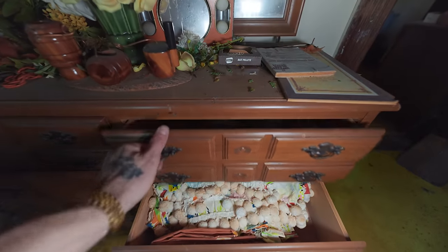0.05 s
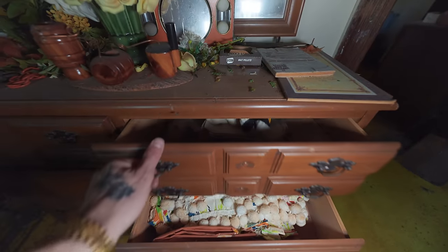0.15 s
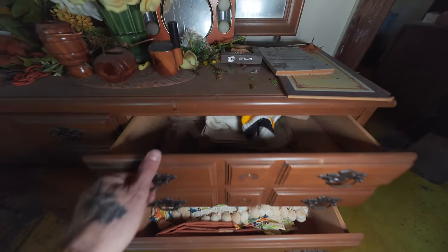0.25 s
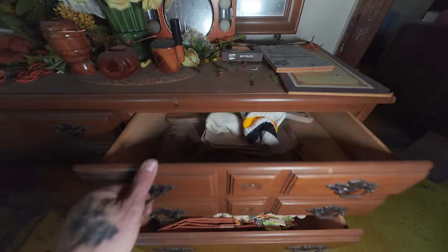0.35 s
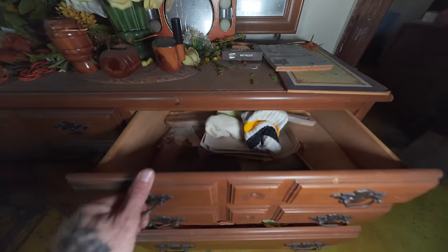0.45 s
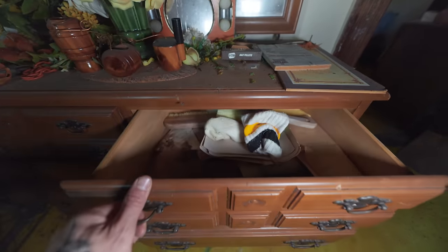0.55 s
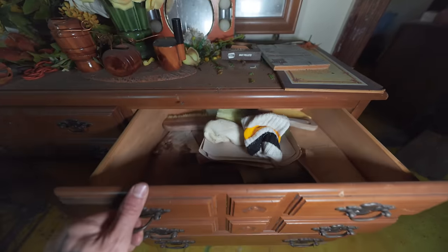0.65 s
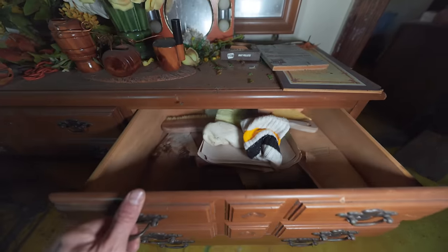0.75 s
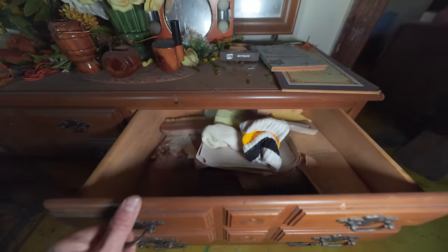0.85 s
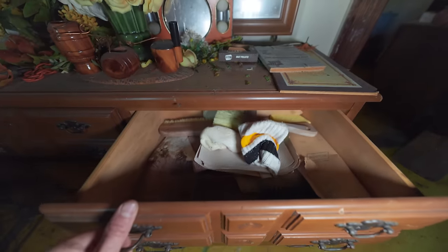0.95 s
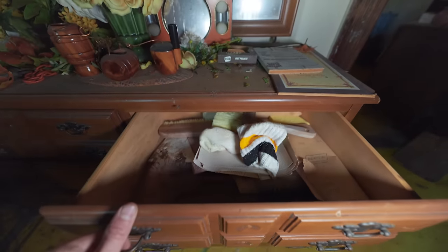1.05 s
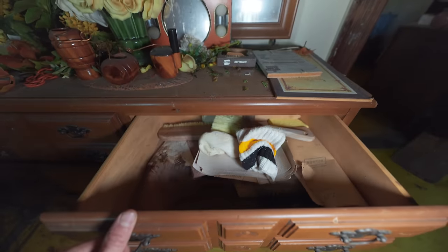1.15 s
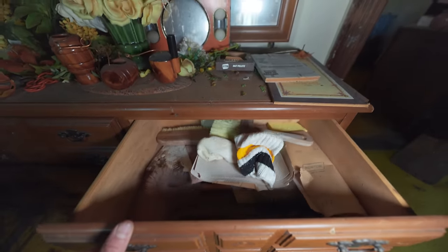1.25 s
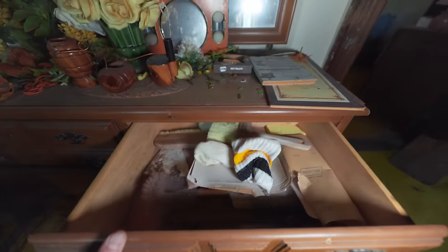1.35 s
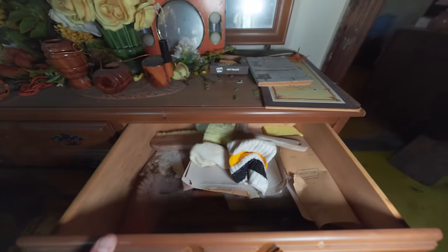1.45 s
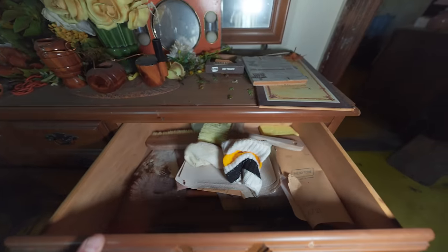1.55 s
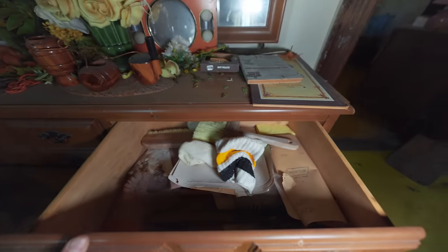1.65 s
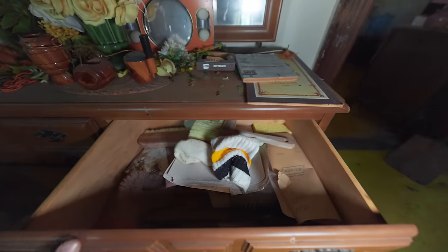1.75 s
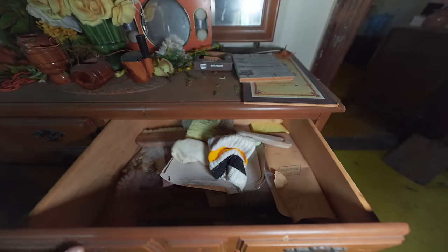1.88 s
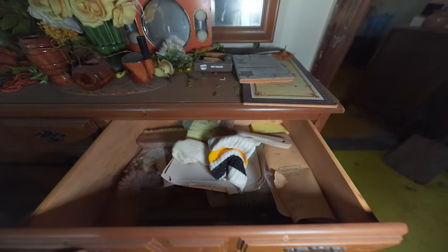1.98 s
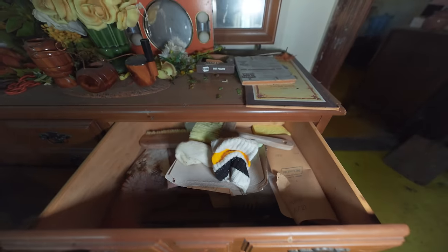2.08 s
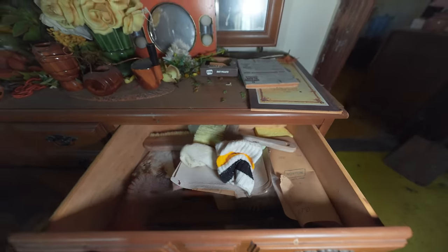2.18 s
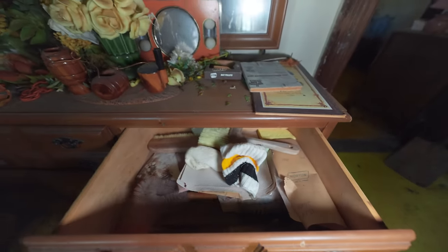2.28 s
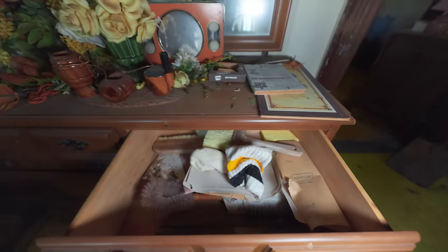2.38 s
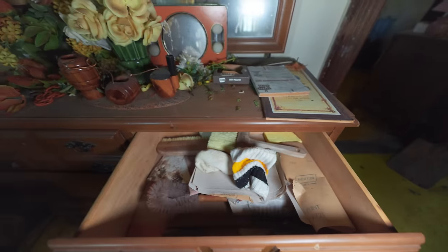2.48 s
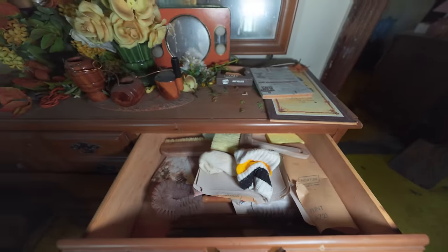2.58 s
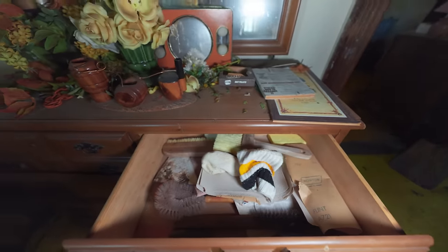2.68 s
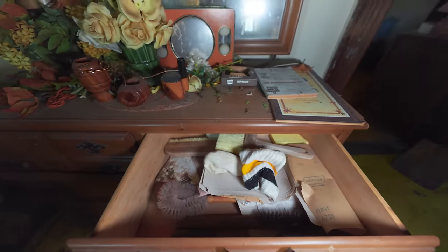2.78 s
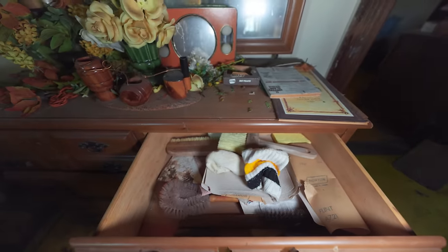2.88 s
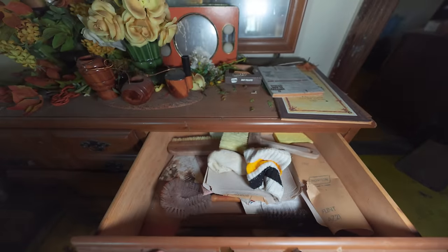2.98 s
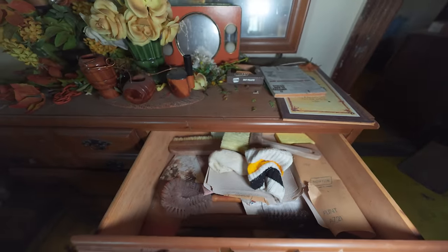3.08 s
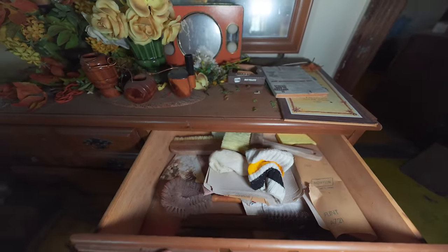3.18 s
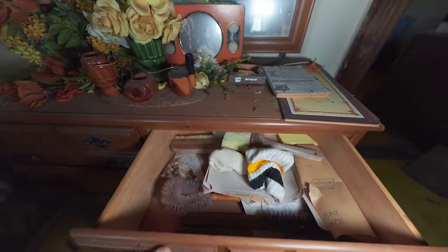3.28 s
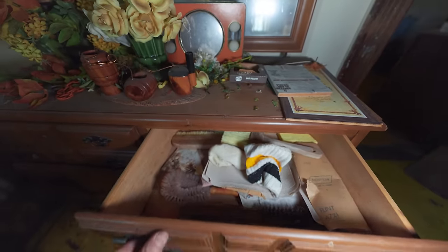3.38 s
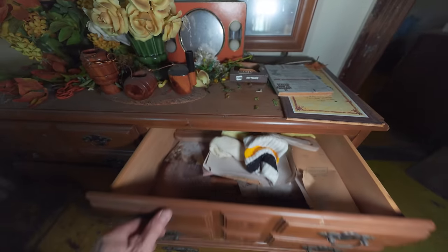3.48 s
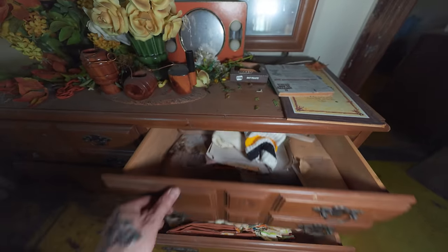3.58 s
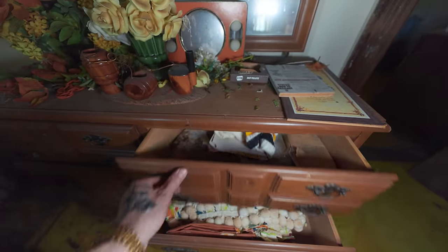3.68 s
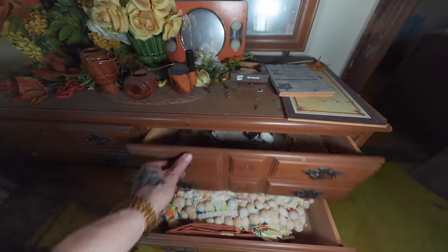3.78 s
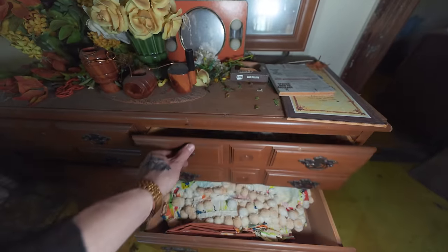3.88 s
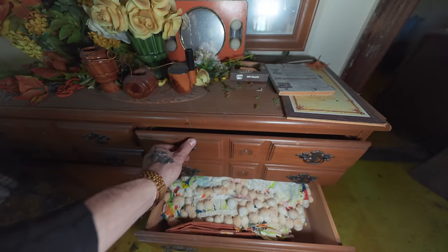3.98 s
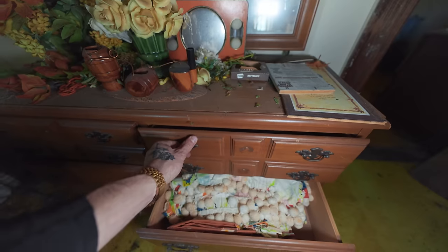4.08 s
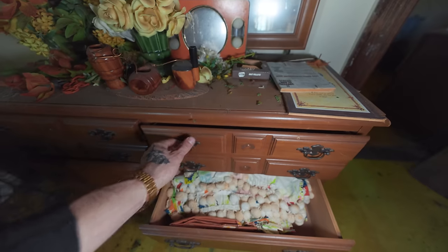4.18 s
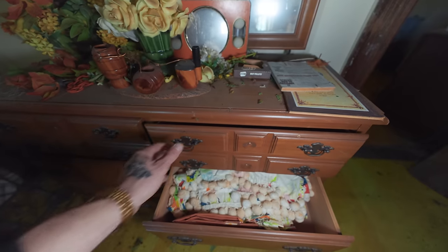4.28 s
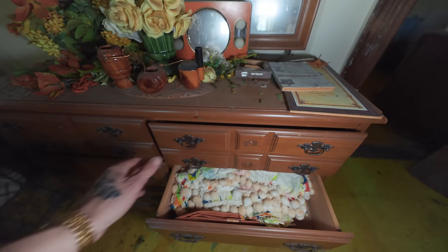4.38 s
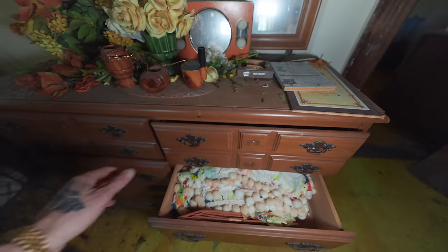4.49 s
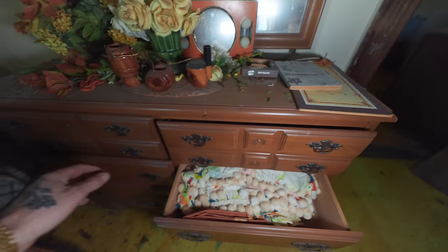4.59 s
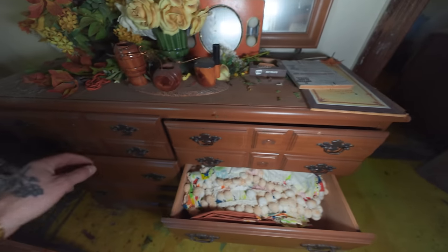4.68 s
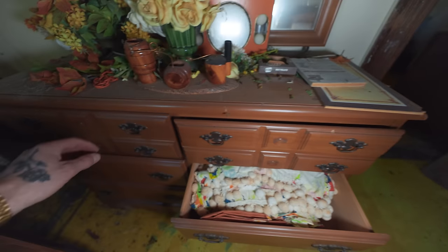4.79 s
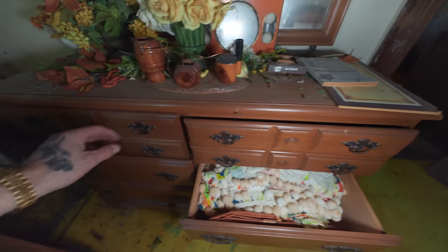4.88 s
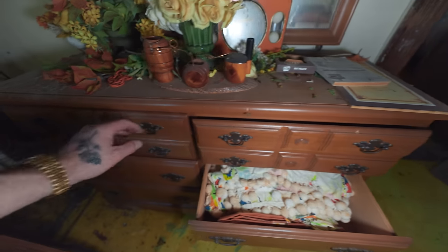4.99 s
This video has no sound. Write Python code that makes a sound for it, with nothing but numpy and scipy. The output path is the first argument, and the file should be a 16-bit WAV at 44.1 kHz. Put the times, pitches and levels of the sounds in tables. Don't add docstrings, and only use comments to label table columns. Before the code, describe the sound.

Close microphone in a still, quiet room: a dresser drawer starts with ticks and a stick-slip wooden rub, booms hollowly, and slides on with a faint creaky hum. Sparse ticks and soft knocks follow while it stands open. A knock begins the return slide, ending in loud bright clacks, a solid wooden bump and a few last clicks.

```python
import sys
import numpy as np
from scipy import signal
from scipy.fft import rfft, irfft
from scipy.io import wavfile

SR = 44100
rng = np.random.default_rng(int(sys.argv[2]) if len(sys.argv) > 2 else 0)


def wrap_up_sound(samples):
    columns = np.atleast_2d(samples).T
    tamed = np.clip(columns, -1, 1)
    steps = np.round(tamed * 32767).astype(np.int16)
    wavfile.write(sys.argv[1], SR, steps)


def ratio_of_db(decibels):
    return 10 ** (np.asarray(decibels, float) / 20)


N = 222264

# time_s, rubbing_effort_db, runner_weight_db, panel_under_contact_hz
PULL_STROKE = [
    (0, -43, 21, 430),
    (.07, -45.5, 15, 940),
    (.17, -36.5, -3.5, 740),
    (.27, -40.5, 6.5, 480),
    (.45, -45, 3.5, 646),
    (.7, -49.5, 6, 775),
    (.85, -51.5, -1, 1050),
    (1.02, -53.5, -10, 988),
    (1.09, -65, -10, 700),
]
PUSH_STROKE = [
    (3.4, -45.5, -4, 450),
    (3.412, -44, -4, 450),
    (3.46, -45.5, -4, 380),
    (3.56, -42, -4, 686),
    (3.69, -42.5, 5, 470),
    (3.9, -42, 2.5, 810),
    (3.99, -40.5, -3, 770),
    (4.06, -48.5, 12.5, 455),
    (4.15, -51.5, 7, 800),
]
# start_s, length_s, effort_db, weight_db, panel_hz
NUDGES = [
    (1.167, 0.42, -51.5, -21, 745),
    (1.312, 0.23, -48.5, -15, 1010),
    (1.659, 0.36, -46, -24, 573),
    (1.855, .39, -47, -10.5, 463),
    (2.38, 0.2, -59, -15, 444),
    (2.534, 0.11, -61, -5, 556),
    (2.711, 0.096, -55, -19, 1010),
    (2.994, 0.9, -57, 8, 795),
    (4.117, 0.4, -52, 12, 1070),
    (4.782, 0.31, -52.5, 7, 583),
]
# reference_level_db, slope_db_per_db, weight_share, rest_db
LAYER_ANSWERS = [
    (-45, 1.78, 0.76, -65),
    (-45.5, 1.14, 0.0033, -63.5),
    (-50, 0.91, 0.06, -67),
    (-59.5, 1.22, 0.23, -73.5),
]
# start_s, level_db, weight_db, hold_s
JOLTS = [
    (4.305, -41, -12, 0.099),
    (4.479, -45.5, -10.5, 0.02),
    (4.64, -31, -10.5, 0.076),
]
# level_db, weight_share, rise_s, fade_db_per_s
LAYER_SHAKING = [
    (0, 0.55, 0.036, 181),
    (7, 0.9, 0.0027, 155),
    (-1.2, .01, 0.0069, 250),
    (-7.5, .1, .008, 222),
]
# pitch_hz, width_hz, level_db
CARCASS = [(51.5, 14, -40), (90, 5.5, 2), (133, 7, 1), (189, 5.6, -3), (215, 36, -2.5)]
PANELS = [(352, 370, -2), (438, 145, -1.5), (580, 55, -9), (700, 54, -1.5), (906, 126, -10.5),
          (1120, 235, 0), (1300, 130, -10)]
EDGES = [(1600, 590, -1), (2145, 180, -5), (2560, 163, -4), (3030, 970, -3.5), (3960, 1800, -3)]
# frequency_hz, density_db
HISS = [(2820, -66), (4800, -10.5), (5990, -7.5), (8740, -12), (12800, -11.5), (15100, -23), (16100, -38),
        (16500, -53)]
# frequency_hz, density_db
STILLNESS = [(30, -1), (97, 12), (300, -9.5), (1000, -34), (2600, -17), (5130, -29), (11500, -19.5),
             (15500, -24)]
# start_s, peak_db, pitch_hz, t60_s, swell_s
BOOMS = [
    (0.013, -24, 93.8, 0.43, 0.0058),
    (.295, -8.5, 134, 0.16, 0.035),
    (0.59, -30.5, 131.4, 0.46, .04),
    (1.585, -34, 133, 0.26, 0.016),
    (3.65, -25.5, 128.2, 0.41, 0.011),
    (3.932, -28, 188, 0.34, 0.024),
    (4.656, -20, 90, 0.24, 0.018),
    (4.74, -32.5, 50.6, 0.4, 0.025),
]
# start_s, peak_db, wood_share_db, brightness_db, loudest_ring_hz
TICKS = [(0.0174, -47, 19.5, -19, 1700), (0.0574, -21, -1.5, -7, 3930), (0.0877, -26, -16, -20, 3600),
         (0.1331, -26.5, -1, -8, 4440), (1.3867, -26.5, -1, -8, 3350), (1.6079, -22.5, 0.5, -8.5, 3600),
         (1.8986, -27, 0, -16, 3570), (2.038, -66, -7, 13, 4750), (2.075, -76, -7, -1, 4800),
         (2.105, -68, -18, -20, 3360), (2.374, -28.5, -11, -4.5, 3970), (2.4494, -50, 2, -12, 1500),
         (2.5713, -31, -11, -13, 3400), (2.7394, -54, -14, -20, 2200), (2.9224, -20, -12, -8.5, 3570),
         (3.080, -35, -15, -26, 3380), (3.2025, -22, -10, -2, 3600), (3.4047, -47, 4, -19, 2390),
         (3.5698, -29, -20, -7, 4640), (3.8267, -24.5, 2.5, -10, 1730), (3.9742, -23.5, -0.5, -7.5, 1700)]
# pitch_hz, level_db, t60_s (with the room)
TICK_MODES = [(770, -5, 0.64), (1097, 19, 0.063), (1700, 0, 0.4), (2550, 2.5, 0.2), (4810, 4.5, 0.3),
              (3350, 0, 0.2), (3750, -12, 0.063), (4030, 8, 0.034), (5950, -20, 0.047), (6360, 5, 0.06),
              (7160, 8, 0.18), (8100, -9, 0.28), (9100, 2, 0.44), (9760, 6, 0.06)]
# start_s, level_db, pitch_hz, t60_s
THIN_RINGS = [(.057, -47, 11300, .3), (1.387, -72, 11400, .5), (2.574, -54, 3350, 0.3),
              (2.926, -39, 3380, 0.17), (2.926, -41, 2550, .15), (2.574, -49, 2550, 0.14),
              (3.082, -54, 3350, .2), (3.97, -54, 11300, 0.32), (4.311, -34, 10900, 0.25),
              (4.316, -21.5, 3320, 0.1), (4.333, -23, 4290, 0.093), (4.464, -33, 3504, 0.31)]
# start_s, peak_db, pitch_hz, t60_s, panel_share_db
KNOCKS = [(.25, -30, 304, 0.057, -5), (1.512, -35.5, 487, 0.036, 2.5), (1.529, -27, 156, 0.048, -14),
          (1.606, -33.5, 709.4, 0.17, -7), (1.899, -26.5, 430, 0.047, -9.5), (2.374, -38, 372, 0.11, -3),
          (2.572, -43.5, 434, 0.064, 0.5), (2.923, -39, 414, 0.056, 0), (3.204, -43, 374, .08, 0),
          (3.406, -28.5, 508, 0.025, -2.5), (3.428, -23.5, 136, 0.19, -10), (3.43, -21, 246, 0.049, -22),
          (3.62, -31.5, 509, 0.061, 8.5), (4.193, -26, 119, 0.078, -33), (4.313, -29, 554, 0.13, -15),
          (4.463, -32, 200, 0.079, -1), (4.645, -14.5, 772, 0.07, -16), (4.653, -22.5, 398, 0.19, 5),
          (4.662, -12, 599.6, 0.039, -2.5), (4.671, -28, 197, 0.11, -5)]
# time_s, pitch_hz, level_db
DRAG = [
    (.45, 1060, -81),
    (.53, 1067, -48.5),
    (.65, 1120, -69),
    (.8, 1134, -48),
    (.95, 1210, -54.5),
    (1.04, 1297, -60),
    (1.1, 1300, -72),
]
# start_s, peak_db, wood_share_db, brightness_db, loudest_ring_hz
CLACKS = [(4.131, -33.5, 1.5, -9, 1730), (4.1712, -20.5, -27, -3, 3440), (4.2303, -16.5, -11.5, 2, 2720),
          (4.3095, -45, 18, -30, 2040), (4.3137, -6.5, -3, 5.5, 4130), (4.3354, -39, -13, -18, 4240),
          (4.4445, -23, 2.5, -14, 1600), (4.4624, -11, -6.5, 2, 3620), (4.6163, -17.5, -6.5, -1.5, 3600),
          (4.646, -22.5, 8.5, -19, 2000), (4.706, -21.5, -15, -11, 3200), (4.787, -25.5, -17, -29, 3600),
          (5.003, -52, 12.5, -18, 1400)]
# pitch_hz, level_db, t60_s (with the room)
CLACK_MODES = [(554, -28, 0.23), (1140, 4, 1.3), (1900, -10, 0.19), (5400, -4, 0.06), (2724, -43, 1.4),
               (3600, 11.5, 0.42), (3340, -43, 0.34), (3750, -6, 0.25), (4240, 12.5, 0.068),
               (4740, -23, 0.29), (6390, -0.5, .05), (8240, 2.5, .03), (10060, -5, .05), (14300, -42, .04)]
# frequency_hz, t60_s
ROOM_T60 = [(100, 0.33), (1000, 0.34), (4000, 0.17), (12000, 0.24)]
# frequency_hz, level_db
ROOM_DB = [(100, 0.5), (4000, 5.7), (12000, 0.5)]


def rms_one(x):
    return x / np.sqrt(np.mean(x ** 2) + 1e-20)


def in_time(rows):
    s, *columns = np.transpose(rows)
    t = np.arange(N) / SR
    return [np.interp(t, s, column, left=-150, right=-150) for column in columns]


def at_hz(points, hz):
    table_hz, values = np.transpose(points)
    return np.interp(np.log(np.maximum(hz, 1)), np.log(table_hz), values)


def coloured(x, spectrum):
    gain = ratio_of_db(at_hz(spectrum, np.fft.rfftfreq(N, 1 / SR)))
    return rms_one(irfft(rfft(x) * gain, N))


def drift(rate):
    steps = rng.standard_normal(N // 100 + 1)
    return np.interp(np.arange(N) * rate / SR, np.arange(len(steps)), steps)


def band_limited(x, order, limits_hz, kind):
    return signal.sosfilt(signal.butter(order, limits_hz, kind, fs=SR, output="sos"), x)


def ring(clicks, hz, t60):
    r = ratio_of_db(-60 / (max(t60, .002) * SR))
    w = 2 * np.pi * hz / SR
    return signal.lfilter([0, np.sin(w)], [1, -2 * r * np.cos(w), r * r], clicks + 1e-18)


def swelling_ring(s, level_db, hz, t60, swell_s):
    t = np.maximum(np.arange(N) / SR - s, 0)
    envelope = ratio_of_db(level_db - 60 * t / t60) * (1 - np.exp(-t / swell_s))
    return envelope * np.sin(2 * np.pi * hz * t)


def rubbing(per_s, spread_db):
    sizes = ratio_of_db(spread_db * np.minimum(rng.exponential(1, N), 4)) * rng.choice([-1, 1], N)
    return rms_one(sizes * (rng.random(N) < per_s / SR))


def body(force, resonances, focus_hz, focus_db, patchy_db, patch_rate):
    out, power = 0, 0
    for k, (hz, width, level_db) in enumerate(resonances):
        nearness = np.exp(-(np.log(focus_hz / hz) / 0.13) ** 2)
        gain = ratio_of_db(level_db + focus_db * nearness)
        catches = np.roll(force, k * 3001)
        tone = rms_one(ring(catches, hz, np.log(1000) / np.pi / width))
        out = out + gain * ratio_of_db(patchy_db * drift(patch_rate)) * tone
        power = power + gain ** 2
    return out / np.sqrt(power)


def strokes():
    t = np.arange(N) / SR
    moves = [in_time(PULL_STROKE), in_time(PUSH_STROKE)]
    for s, length, effort_db, weight_db, hz in NUDGES:
        part = (t - s) / length
        shape = np.clip(np.minimum(part / 0.26, (1 - part) / 0.49), 1e-6, 1)
        moves.append([effort_db + 20 * np.log10(shape), weight_db + 0 * t, hz + 0 * t])
    return np.transpose(moves, (1, 0, 2))


def shaking(level_db, share, rise_s, fade_db):
    s, jolt_db, weight_db, hold_s = np.transpose(JOLTS)[:, :, None]
    t = np.arange(N) / SR - s
    peak_db = level_db + jolt_db + share * weight_db
    fading = ratio_of_db(peak_db - fade_db * np.maximum(t - rise_s - hold_s, 0))
    return np.sum(np.clip(t / rise_s, 0, 1) * fading, axis=0)


def runners():
    reference_db = -45
    force = rubbing(per_s=2500, spread_db=2.0)
    effort_db, weight_db, contact_hz = strokes()
    leading = effort_db.argmax(axis=0)
    panel_hz = np.maximum(contact_hz[leading, np.arange(N)], 1)
    edge_hz = np.where(leading < 2, 2500, 1620)
    layers = [body(force, CARCASS, 132, focus_db=4.0, patchy_db=1.0, patch_rate=11.0),
              body(force, PANELS, panel_hz, focus_db=7.5, patchy_db=4.0, patch_rate=16.0),
              body(force, EDGES, edge_hz, focus_db=1.5, patchy_db=3.5, patch_rate=33.0),
              coloured(rubbing(per_s=12000, spread_db=3.5), HISS)]
    out = 0
    for (level_db, follows, share, rest_db), jolt, layer in zip(LAYER_ANSWERS, LAYER_SHAKING, layers):
        moving = ratio_of_db(level_db + follows * (effort_db - reference_db) + share * weight_db)
        rubbed = np.sqrt(np.sum(moving ** 2, axis=0) + ratio_of_db(rest_db) ** 2)
        out = out + (rubbed + shaking(*jolt)) * layer
    return out


def stillness():
    return ratio_of_db(-57.0) * coloured(rng.standard_normal(N), STILLNESS)


def booms():
    return sum(swelling_ring(*boom) for boom in BOOMS)


def strikes(events, modes, chatter_s, damping, crack_db, spot_db, body_db, top_hz):
    s, peak_db, wood_db, bright_db, spot_hz = np.transpose(events)[:, :, None]
    hz, level_db, t60 = np.transpose(modes)
    t = np.arange(round(.12 * SR)) / SR
    contact = np.exp(-t / chatter_s) * (1 - np.exp(-t / 0.0018))
    chatter = rfft(rng.standard_normal((len(s), len(t))) * contact)
    chatter = irfft(chatter / np.sqrt(np.abs(chatter) + 1e-9), len(t)) * np.sqrt(contact)

    scatter_db = 3 * rng.standard_normal((len(s), len(hz)))
    strength = ratio_of_db(level_db + body_db + scatter_db)
    choked = np.clip(damping * t60, .004, 35 / hz)[:, None]
    rings = strength @ (ratio_of_db(-60 * t / choked) * np.sin(2 * np.pi * hz[:, None] * t))
    rings = rings + ratio_of_db(spot_db - 60 * t / .008) * np.sin(2 * np.pi * spot_hz * t)
    raw = signal.fftconvolve(rings, chatter, axes=1)[:, :len(t)] + ratio_of_db(crack_db) * chatter

    sound = 0
    # wood, metal and brightness are balanced by their first 12 ms
    for share_db, limits_hz in ((wood_db, [550, 1450]), (0, [1500, 4900]), (bright_db, [4900, top_hz])):
        band = band_limited(raw, 3, limits_hz, "band")
        early = band[:, :len(t) // 10].std(axis=1, keepdims=True)
        sound = sound + ratio_of_db(peak_db + share_db - 17.0) * band / early
    out = np.zeros(N + len(t))
    starts = np.round((s - .0012) * SR).astype(int)
    np.add.at(out, starts + np.arange(len(t)), sound)
    return out[:N]


def pull_ticks():
    return strikes(TICKS, TICK_MODES, chatter_s=0.0049, damping=.15, crack_db=27, spot_db=6,
                   body_db=-1.0, top_hz=12400)


def singing_pulls():
    singing = sum(swelling_ring(s, level_db, hz, t60, 0.001) for s, level_db, hz, t60 in THIN_RINGS)
    return singing * ratio_of_db(4.0 * drift(140.0))


def knock_notes():
    return sum(swelling_ring(s, peak_db, hz, t60, 1 / hz) for s, peak_db, hz, t60, _ in KNOCKS)


def knocked_panels():
    blows = np.zeros(N)
    lag = np.arange(round(.04 * SR))
    judder = rng.standard_normal((len(KNOCKS), len(lag))) * np.exp(-lag / (0.013 * SR))
    for (s, peak_db, _, _, share_db), shake in zip(KNOCKS, judder):
        blows[round(s * SR) + lag] += ratio_of_db(peak_db + share_db) * shake
    blows = band_limited(blows, 2, 1100, "low")
    return sum(ratio_of_db(level_db - 27.0) * ring(blows, hz, 2.7 / width) for hz, width, level_db in PANELS)


def drag():
    hz, level_db = in_time(DRAG)
    turn = 2 * np.pi * np.cumsum(hz) / SR
    return ratio_of_db(level_db) * (drift(90.0) * np.sin(turn) + drift(90.0) * np.cos(turn))


def pull_clacks():
    return strikes(CLACKS, CLACK_MODES, chatter_s=0.0029, damping=0.45, crack_db=33, spot_db=22.5,
                   body_db=8.5, top_hz=14200)


def room(x):
    t = np.arange(round(.6 * SR)) / SR
    edges = 60 * 2 ** np.arange(9.)
    echoes = 0
    for low, high in zip(edges, edges[1:]):
        band = band_limited(rng.standard_normal(len(t)), 2, [low, high], "band")
        middle = np.sqrt(low * high)
        echoes = echoes + band * ratio_of_db(at_hz(ROOM_DB, middle) - 60 * t / at_hz(ROOM_T60, middle))
    echoes = echoes * np.clip(t / 0.0015, 0, 1)
    return signal.fftconvolve(x, echoes / np.linalg.norm(echoes))[:N]


def scene():
    ticks, clacks = pull_ticks(), pull_clacks()
    waver = ratio_of_db(2.3 * drift(35.0))
    thuds = (booms() + knock_notes()) * waver + knocked_panels()
    echoes = room(ratio_of_db(-2.0) * ticks + ratio_of_db(-2.5) * clacks + ratio_of_db(-8.0) * thuds)
    metal = ratio_of_db(5.0) * (ticks + clacks) + singing_pulls()
    return (metal + thuds + echoes + runners() + drag() + stillness())[None]


def band_limit(x):
    return signal.sosfilt(signal.butter(12, 17060, fs=SR, output="sos"), x)


def record(dry):
    dip_hz, dip_width_hz, dip_depth = 5080, 830, 0.55
    b, a = signal.iirpeak(dip_hz, dip_hz / dip_width_hz, fs=SR)
    x = dry - dip_depth * signal.lfilter(b, a, dry)
    x = .9 * np.tanh(x / .9)
    x = band_limited(x, 4, 42, "high")
    x = band_limited(x, 2, 14500, "low")
    x = signal.sosfilt(signal.cheby2(10, 60, 17100, fs=SR, output="sos"), x)
    return band_limit(x)


dry = scene()
out = record(dry)
wrap_up_sound(out)
```